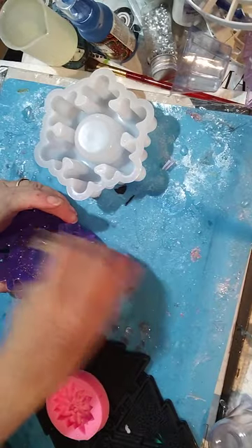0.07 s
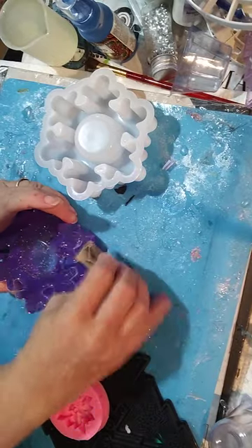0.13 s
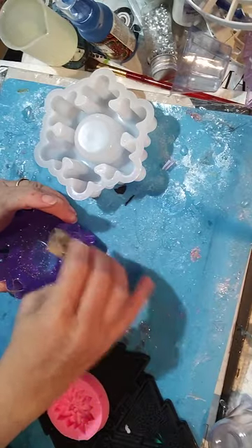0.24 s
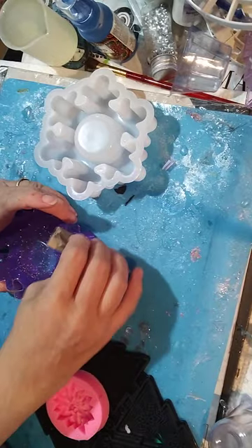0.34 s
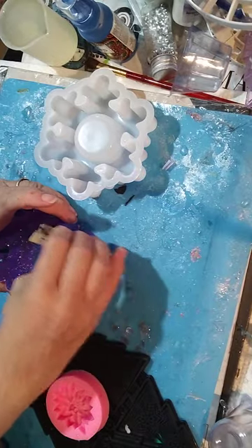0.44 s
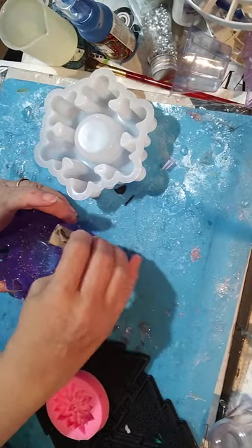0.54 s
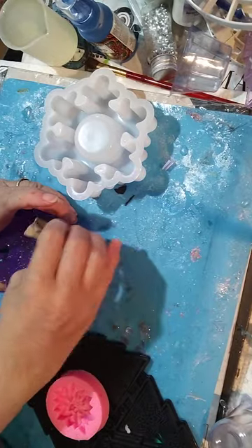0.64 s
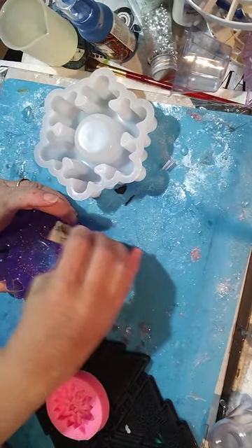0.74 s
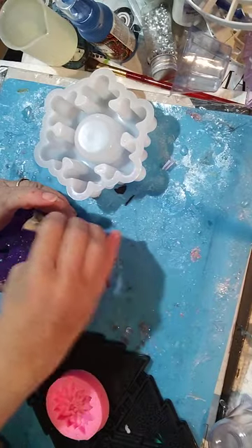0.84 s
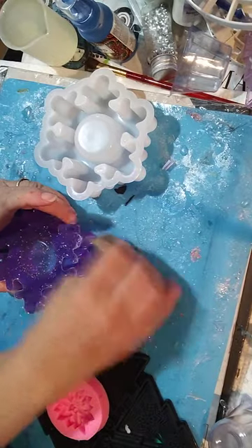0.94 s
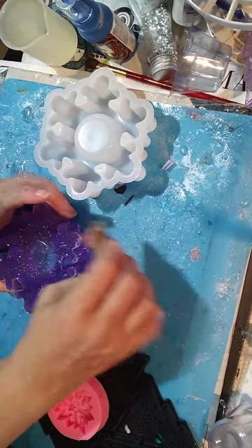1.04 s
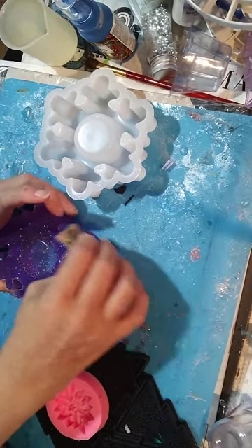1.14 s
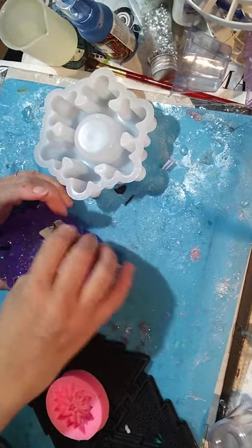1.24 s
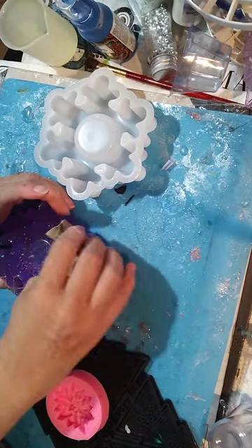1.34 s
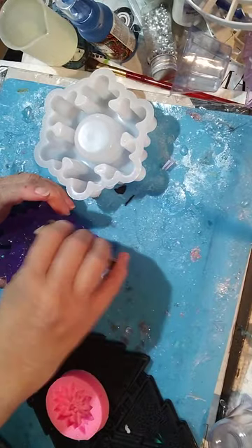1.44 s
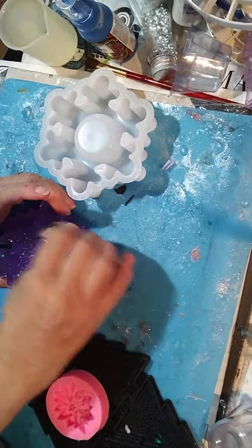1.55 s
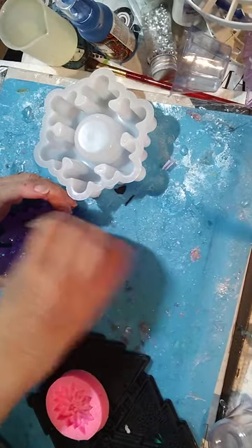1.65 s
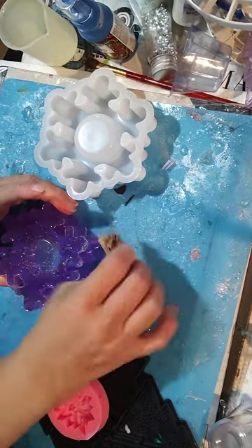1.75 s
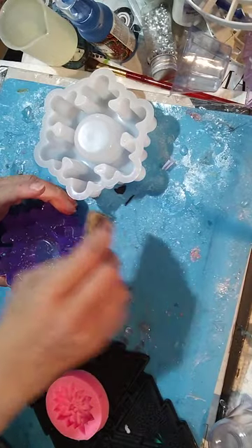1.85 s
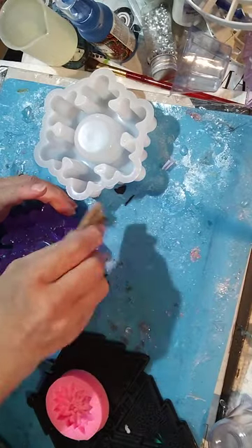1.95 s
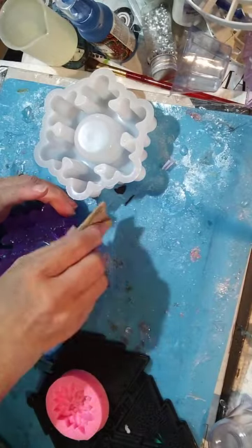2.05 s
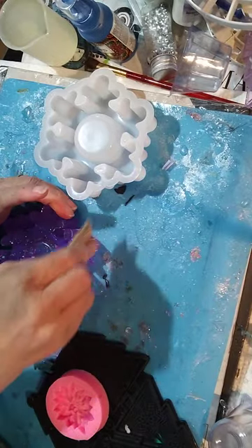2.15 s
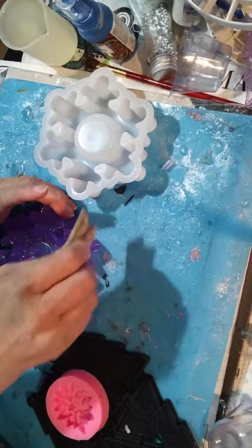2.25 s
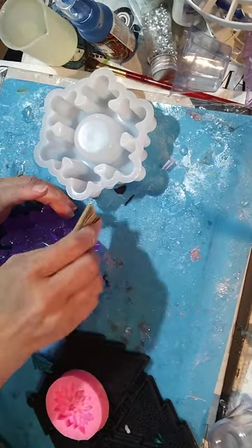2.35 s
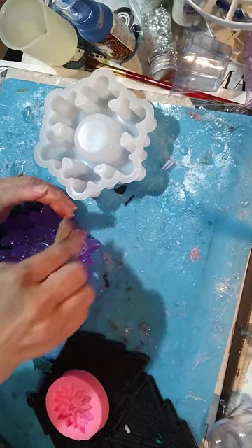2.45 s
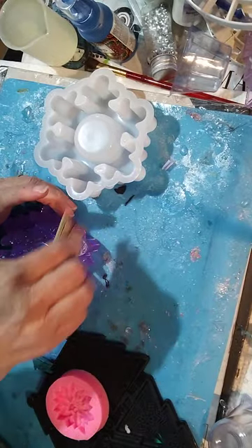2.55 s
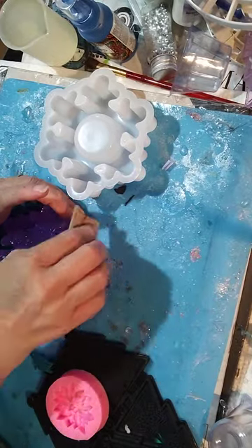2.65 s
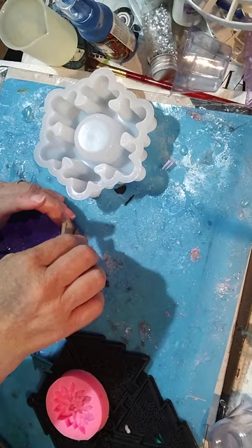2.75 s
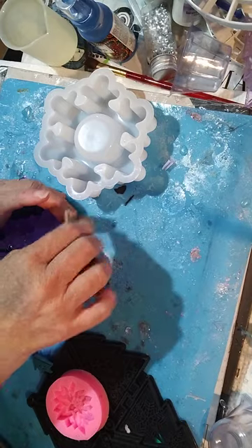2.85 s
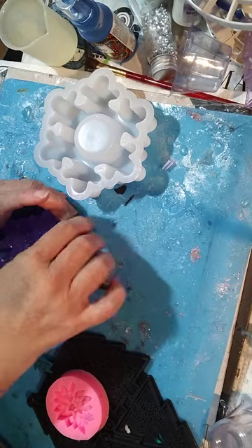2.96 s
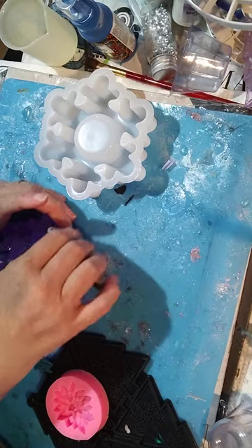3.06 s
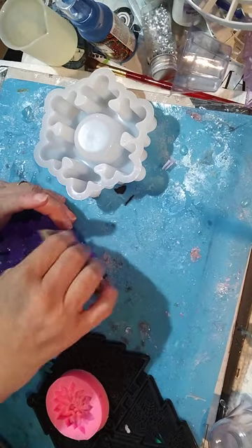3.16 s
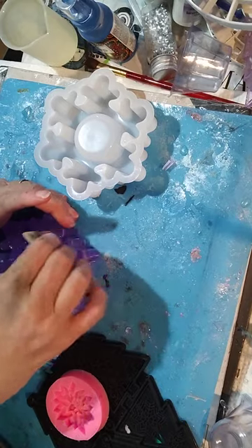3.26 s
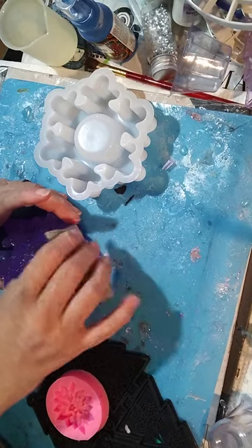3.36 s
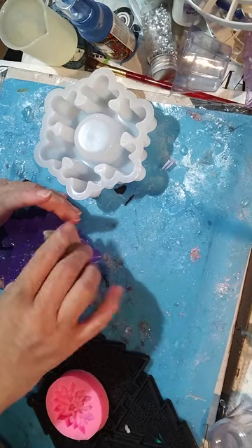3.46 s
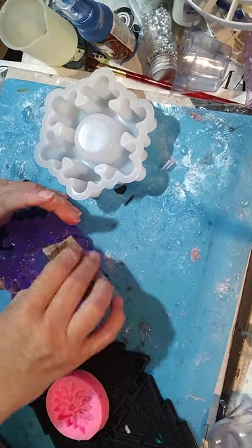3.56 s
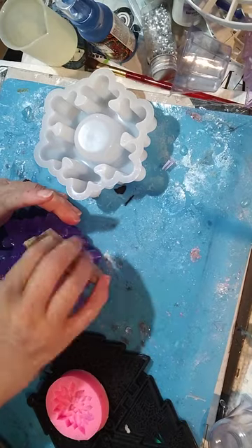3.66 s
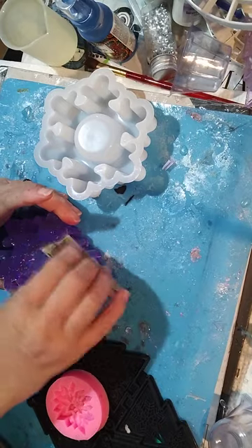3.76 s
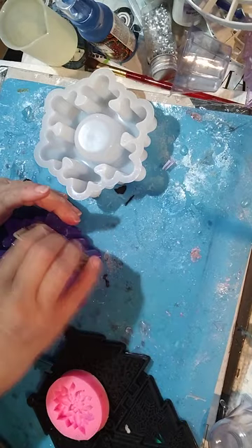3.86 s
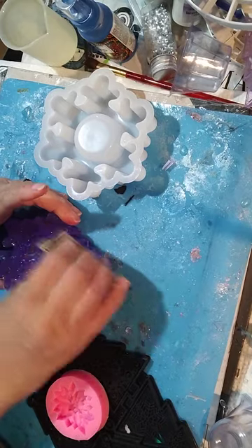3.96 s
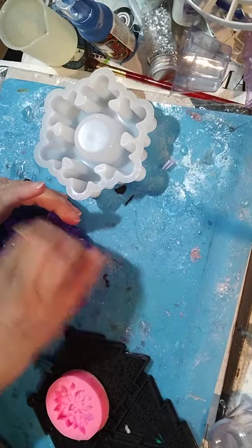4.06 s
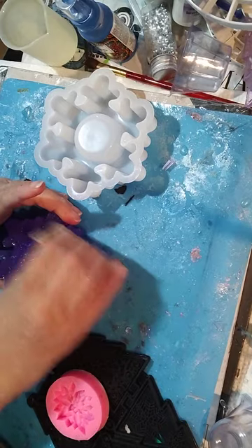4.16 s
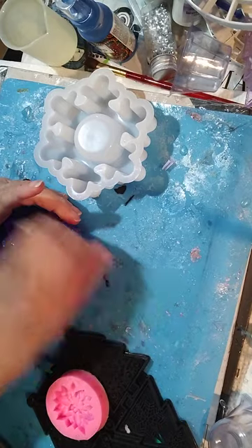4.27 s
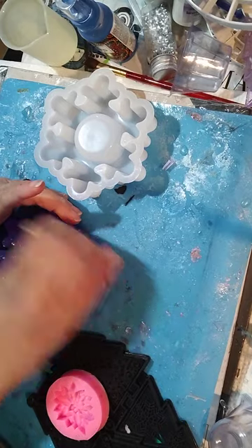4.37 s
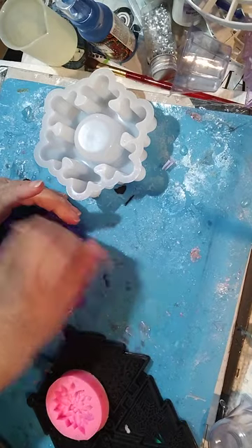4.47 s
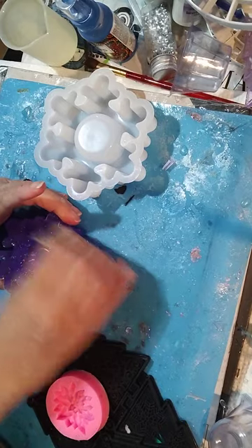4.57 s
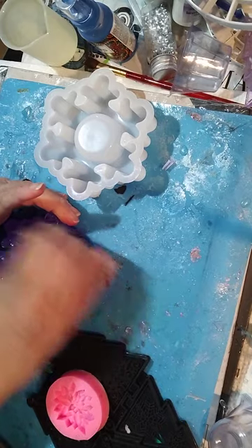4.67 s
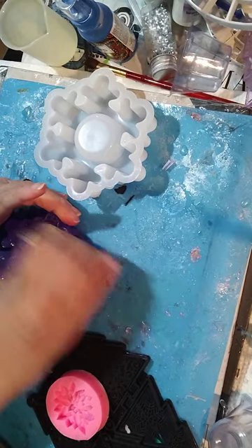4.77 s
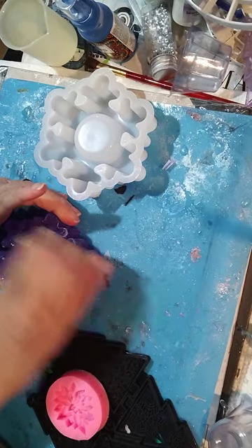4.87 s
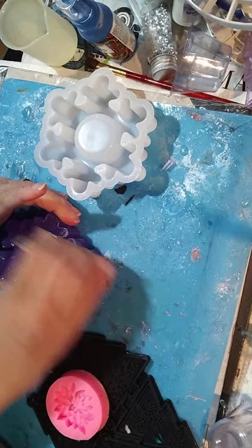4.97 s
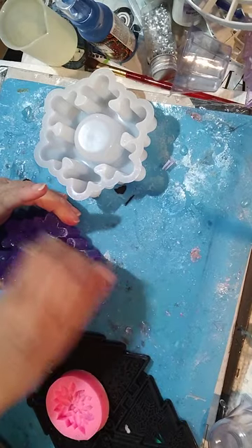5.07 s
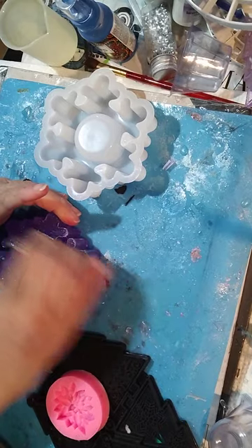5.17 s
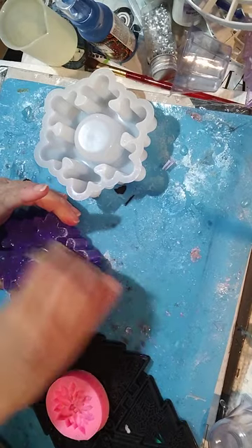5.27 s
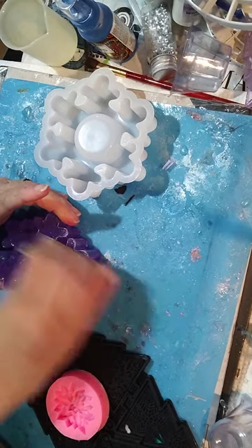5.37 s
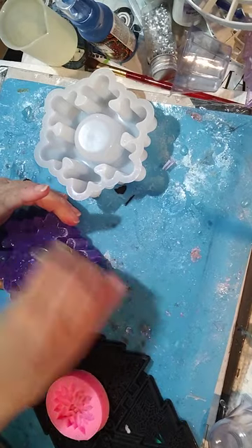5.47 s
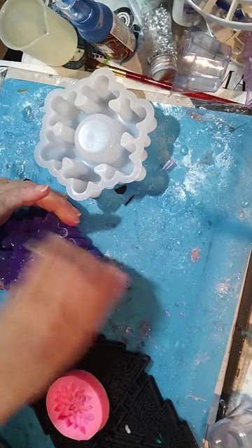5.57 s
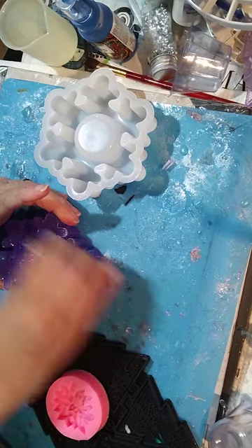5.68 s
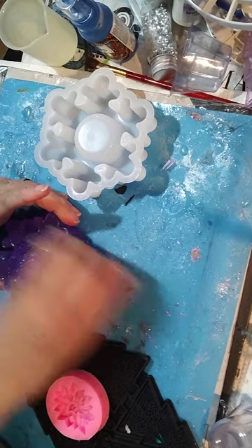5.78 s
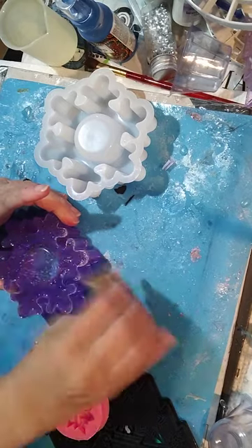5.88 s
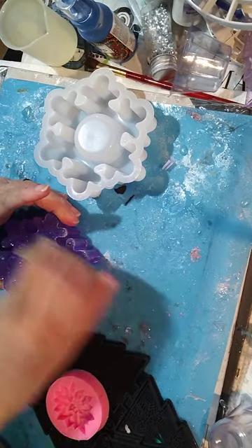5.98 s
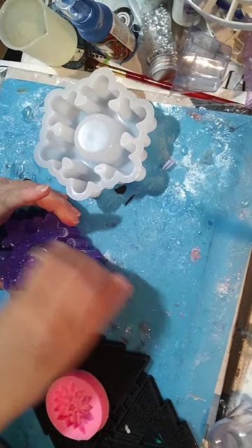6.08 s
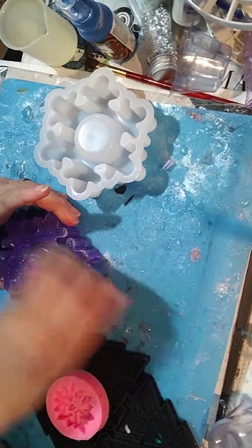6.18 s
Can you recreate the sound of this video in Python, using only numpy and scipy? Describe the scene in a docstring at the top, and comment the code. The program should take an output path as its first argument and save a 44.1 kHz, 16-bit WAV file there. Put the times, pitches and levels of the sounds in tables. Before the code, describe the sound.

Sandpaper rubs a hard resin casting held on a table. The first strokes are quick and uneven, then come gaps with soft rustling, edge ticks, light knocks and one tiny rising buzz as the piece rocks. After that, a continuous rapid to-and-fro rasp runs almost to the end, harsher and louder. Heard very close in a small quiet room with faint air tone and short reflections.

```python
"""Sandpaper on a resin casting

Folded sandpaper is rubbed quickly to and fro over a lumpy resin casting that a hand holds on a craft table.
Grit is noise roughened by uneven snags and swelled by each stroke; it hisses in the paper and rings the
resonances of casting and table. Catching edges tick, the casting knocks and once buzzes as it rocks to rest.
A small quiet room surrounds it; a phone close above hears it through two unlike microphone ports."""
import sys
import numpy as np
from scipy import signal
from scipy.fft import rfft, irfft
from scipy.io import wavfile
from scipy.ndimage import uniform_filter1d

SR = 44100
rng = np.random.default_rng(int(sys.argv[2]) if len(sys.argv) > 2 else 0)


def log_audio(samples):
    """Write samples as a 16-bit WAV file to the path given in sys.argv[1]."""
    # one column per channel
    frames = np.atleast_2d(samples).T
    # limit to full scale, then quantise
    limited = np.clip(frames, -1, 1)
    pcm = np.round(limited * 32767).astype(np.int16)
    wavfile.write(sys.argv[1], SR, pcm)


N = 274302

# Rubbing strokes: (start [s], length [s], relative hiss level [dB], pressure peak "early" or "late")
STROKES = [(0.0, 0.014, -30, "early"), (.075, 0.053, -30.5, "late"), (.168, 0.11, -20, "early"),
           (0.512, 0.061, -31.5, "late"), (.609, 0.047, -31.3, "late"), (.696, .054, -29.5, "early"),
           (0.771, 0.082, -31, "late"), (0.884, 0.06, -28.5, "early"), (0.977, 0.079, -27, "early"),
           (1.498, 0.047, -40.5, "late"), (1.585, 0.058, -36.5, "early"), (1.669, 0.074, -27, "late"),
           (1.753, 0.062, -20.5, "late"), (2.009, 0.042, -33, "late"), (2.122, 0.044, -43, "early"),
           (2.184, 0.11, -36, "late"), (2.486, 0.14, -32, "late"), (2.752, 0.031, -43, "early"),
           (2.891, 0.028, -41, "early"), (2.938, 0.042, -46.5, "early"), (3.065, 0.088, -46.5, "late"),
           (3.268, .042, -26.5, "early"), (3.372, 0.083, -53, "late"), (3.555, 0.066, -42, "early"),
           (3.62, .055, -38.5, "early"), (3.695, 0.076, -36, "early"), (3.812, 0.061, -26.5, "late"),
           (3.912, 0.074, -20.5, "late"), (4.016, 0.078, -20.5, "early"), (4.117, 0.09, -16.5, "early"),
           (4.227, 0.083, -19.5, "early"), (4.336, 0.078, -15.5, "late"), (4.435, 0.091, -20, "early"),
           (4.556, 0.079, -18.5, "late"), (4.656, .079, -19, "early"), (4.768, .09, -21, "late"),
           (4.878, 0.067, -18.5, "early"), (4.974, 0.082, -17.5, "late"), (5.079, .083, -16, "early"),
           (5.189, 0.082, -16.5, "early"), (5.291, 0.081, -16.5, "early"), (5.395, 0.085, -21.5, "early"),
           (5.49, 0.065, -20, "early"), (5.595, 0.066, -22.5, "late"), (5.689, 0.071, -23, "early"),
           (5.784, 0.079, -23.5, "late"), (5.881, 0.077, -16.5, "early"), (6.189, 0.042, -24, "late")]
# Part of a stroke spent swelling, for each place of the pressure peak: {peak: share [0-1]}
RISE_SHARE = {"early": .3, "late": .6}
# Hum under a stroke whose hiss is at FIRM_DB: (time [s], casting level [dB], table level [dB])
HUM_LEVELS = [(0, -36.5, -36.5), (.2, -34.5, -51), (.6, -36, -41.5), (1.0, -38.5, -37.5), (1.6, -39.5, -38),
              (2.0, -37.5, -53), (2.4, -34.5, -42), (2.9, -46.5, -43.5), (3.27, -34.5, -61),
              (3.55, -41, -44.5), (3.63, -42.5, -37.5), (3.799, -41.5, -47), (4.2, -41, -40.5),
              (5.2, -40.5, -43.5), (6.2, -41, -43)]
# Edges of the bands in which the paper's hiss swells separately: (frequency [Hz])
PAPER_BAND_EDGES = [3000, 4500, 6200, 9000, 18000]
# Casting resonances: (frequency [Hz], width [Hz], level rubbed on the rim [dB], level rubbed on the face [dB])
CASTING_MODES = [(819, 25, -6, -31), (912, 47, 4, -3.5), (1158, 140, 0.5, -2.5), (1446, 370, 6, 0),
                 (2065, 1090, 10.5, 16.5), (2700, 280, 9.5, -6), (3290, 220, -3.5, 3)]
# Table-top resonances: (frequency [Hz], width [Hz], relative level [dB])
TABLE_MODES = [(102, 26, 0), (141, 16, 0), (185, 50, -5), (265, 14, -4), (310, 40, -2), (405, 70, -7),
               (520, 150, -10)]
# Room-tone spectrum: (frequency [Hz], relative level [dB per Hz])
AIR_SPECTRUM = [(30, -20), (120, 10.5), (250, 0), (600, -12), (2000, -18.5), (6000, -30), (14000, -10)]
# Paper edge catching on the casting: (time [s], relative burst level [dB])
TICKS = [(.401, -39), (.469, -43.5), (.8854, -27), (1.0289, -17), (1.3097, -49), (1.4115, -36.5),
         (1.4395, -32), (1.5905, -37), (1.9014, -35), (1.9202, -30.5), (1.9748, -28.5), (2.0139, -24),
         (2.1304, -30), (2.295, -23.5), (2.3268, -30), (2.7557, -31), (2.768, -33), (2.9052, -18),
         (2.9515, -32), (3.0151, -24.5), (3.0721, -30.5), (3.1286, -30), (3.137, -31), (3.2126, -40),
         (3.2722, -14), (3.2877, -17), (3.3972, -40), (3.5643, -28), (3.571, -28), (3.608, -34),
         (3.799, -31)]
# Light rustle of the paper on the casting, during and between strokes, with some faint rubs:
# (time [s], relative hiss level [dB])
RUSTLE = [(1.2, -71), (1.27, -57), (1.42, -61), (1.85, -40), (2.1, -66), (2.3, -41), (2.4, -46.5),
          (2.47, -37.5), (2.65, -48.5), (2.87, -44.5), (2.98, -38.5), (3.05, -76), (3.2, -59),
          (3.24, -43.5), (3.36, -80), (3.56, -54.5), (3.8, -74), (3.88, -70)]
# Casting knocking on the table: (time [s], relative burst level [dB])
KNOCKS = [(2.129, -38), (2.753, -40.5), (2.957, -40), (3.372, -44.5), (3.567, -41), (6.183, -32)]
# Colour of each microphone port: (frequency [Hz], gain [dB])
LEFT_PORT = [(60, -6.5), (600, -4), (2000, 0.5), (3500, -5.5), (5200, -9.5), (8500, 0), (10000, -1.5),
             (14500, -15.5)]
RIGHT_PORT = [(60, -15), (300, -5), (1200, -5.5), (2000, 3.5), (3900, 8.5), (4950, 15), (6950, 19.5),
              (7850, 5.5), (9050, -2.5), (10100, -10), (12000, -6), (14500, -10.5)]

START_DB, END_DB = -12.5, -18.0  # stroke level at touch and one fall time after its peak
TOUCH_S = 0.0034  # time scale of the touch
HUM_FLATNESS = 0.82  # share of the hiss's swell and fade in dB that the hum takes
FIRM_DB = -20  # reference hiss
CASTING_SLOPE, TABLE_SLOPE = 0.78, 0.35  # dB of hum for each dB of hiss
PAPER_DB = -14.0  # mix level of the paper
FACE_FROM_S = 4  # the paper moves from the rim to the face
RUSTLE_CASTING_DB, TICK_CASTING_DB, KNOCK_CASTING_DB = -21.0, -27, -6  # share that rings the casting
KNOCK_TABLE_DB = 1.5
AIR_DB = -57  # room tone before the ports
NEAR_T60_S, NEAR_DB, ROOM_T60_S, ROOM_DB = 0.14, -7, 0.51, -22.5
ROCK_S, ROCK_LENGTH_S, ROCK_FROM_HZ, ROCK_TO_HZ, ROCK_DB = 2.811, .026, 230, 480, -44
BASS_CUT_HZ, TOP_HZ = 84, 14400


def undb(db):
    """Amplitude factor for a level in dB."""
    return 10 ** (np.asarray(db) / 20)


def unit(x):
    """Scale to an RMS of 1."""
    return x / np.sqrt(np.mean(x ** 2))


def walk(rate):
    """Random levels held 1 / rate seconds and slewed twice; spread near 1."""
    hold = int(SR / rate)
    steps = np.repeat(rng.standard_normal(N // hold + 1), hold)
    slewed = uniform_filter1d(uniform_filter1d(steps, hold), hold)
    return 1.3 * slewed[:N]  # makes up for the spread lost in slewing


def pair(like):
    """Noise for two ports, with correlation `like` between them."""
    common, opposed = rng.standard_normal((2, N))
    like = np.clip(like, 0, 1)
    side = np.array([[1], [-1]])
    return np.sqrt((1 + like) / 2) * common + np.sqrt((1 - like) / 2) * opposed * side


def decay(x, ms):
    """Let every impulse die away exponentially with a time constant in ms."""
    return signal.lfilter([1], [1, -np.exp(-1000 / (ms * SR))], x)


def bursts(rows, ms):
    """A dying envelope at each (time, level)."""
    x = np.zeros(N)
    for s, db in rows:
        x[int(s * SR)] += undb(db)
    return decay(x, ms)


def colour(x, points):
    """Causal filter through (Hz, dB) points, from the cepstrum of the log gain."""
    hz, db = np.transpose(points)
    size = 2 ** 12
    grid = np.maximum(np.arange(size // 2 + 1) * SR / size, 1)
    log_gain = np.interp(np.log(grid), np.log(hz), db) * np.log(10) / 20
    cep = irfft(log_gain)
    # folding the cepstrum forward gives minimum phase
    cep[1:size // 2] *= 2
    cep[size // 2 + 1:] = 0
    impulse = irfft(np.exp(rfft(cep)))
    return signal.fftconvolve(x, impulse)[:N]


def ring(x, modes, wander_db):
    """Sum of resonances; the contact spot moves, so each is driven more or less from moment to moment."""
    out = 0
    power = sum(undb(2 * m[2]) for m in modes)
    for hz, width, db in modes:
        radius = np.exp(-np.pi * width / SR)
        angle = 2 * np.pi * hz / SR
        gain = undb(db) * np.sin(angle) * np.sqrt(2 * (1 - radius ** 2) / power)
        drive = x * undb(wander_db * walk(12))
        out = out + signal.lfilter([gain], [1, -2 * radius * np.cos(angle), radius ** 2], drive)
    return out


def grit(rate, spread_db, ms):
    """Bite of the grains on smooth contact: snags of very unequal size, each a short dying burst."""
    snags = rng.random(N) < rate / SR  # rate in snags per second
    size_db = spread_db * np.minimum(rng.exponential(size=N), 3)
    return unit(1 + decay(snags * undb(size_db), ms))


def room_tone():
    """Quiet steady air: coloured noise partly shared by the ports."""
    air = np.array([colour(c, AIR_SPECTRUM) for c in pair(0.27)])
    return unit(air) * undb(AIR_DB)


def stroke_pressure():
    """Pressure of each stroke: quick touch, swell, accelerating fade; rows for hiss, casting and table."""
    t = np.arange(N) / SR
    power = np.zeros((3, N))
    when, casting, table = np.transpose(HUM_LEVELS)
    for s, length, db, peak in STROKES:
        rise = RISE_SHARE[peak] * length
        fall = length - rise
        span = slice(max(int((s - 4 * TOUCH_S) * SR), 0), int((s + rise + 3 * fall) * SR))
        d = t[span] - s
        swell = START_DB * np.abs(1 - d / rise) ** 2.87
        fade = END_DB * (np.abs(d - rise) / fall) ** 2.44
        shape = np.where(d < rise, swell, fade)
        touch = undb(np.minimum(d, 0) / TOUCH_S * 10)
        casting_db = np.interp(s, when, casting) + CASTING_SLOPE * (db - FIRM_DB)
        table_db = np.interp(s, when, table) + TABLE_SLOPE * (db - FIRM_DB)
        # the hum swells and fades less steeply than the hiss
        hum_shape = HUM_FLATNESS * shape
        levels = np.array([db + shape, casting_db + hum_shape, table_db + hum_shape])
        power[:, span] += (touch * undb(levels)) ** 2
    return np.sqrt(power)


def paper_hiss(pressure, rustle):
    """Grit noise and edge ticks in the folded sheet, which flexes so each band swells on its own."""
    rubbing = pressure * grit(700, 1.3, 0.48) * undb(1.62 * walk(120))
    noise = (rubbing + rustle + edge_ticks(1.88)) * pair(0.)
    out = 0
    for band in zip(PAPER_BAND_EDGES, PAPER_BAND_EDGES[1:]):
        sos = signal.butter(1, band, "band", fs=SR, output="sos")
        out = out + signal.sosfilt(sos, noise) * undb(1.07 * walk(21.925))
    return undb(PAPER_DB) * out


def casting_hum(pressure, rustle, knocks):
    """Grit, rustle, ticks and knocks ring the resin; rim and face excite its resonances differently."""
    force = pressure * grit(500, 1.1, 1.0) + undb(RUSTLE_CASTING_DB) * rustle
    force = force + undb(TICK_CASTING_DB) * edge_ticks(4.7) + undb(KNOCK_CASTING_DB) * knocks
    body = force * pair(0.42)
    on_face = np.arange(N) / SR >= FACE_FROM_S
    rim_modes = [(hz, width, rim_db) for hz, width, rim_db, _ in CASTING_MODES]
    face_modes = [(hz, width, face_db) for hz, width, _, face_db in CASTING_MODES]
    return ring(body * ~on_face, rim_modes, 4.5) + ring(body * on_face, face_modes, 3.4)


def table_hum(pressure, knocks):
    """Grit noise with sparser snags and the knocks ring the low resonances of the table top."""
    force = pressure * grit(200, 0.98, 1.7) + undb(KNOCK_TABLE_DB) * knocks
    return ring(force * pair(0.91), TABLE_MODES, 2.6)


def room(x):
    """Close clutter on the table scatters at once; the walls give a longer faint tail."""
    t = np.arange(SR // 2) / SR

    def tail(db, t60):
        energy = t60 * SR / np.log(10 ** 6)
        return undb(db - 60 * t / t60) / np.sqrt(energy)

    echoes = (tail(NEAR_DB, NEAR_T60_S) + tail(ROOM_DB, ROOM_T60_S)) * pair(0.56)[:, :len(t)]
    return x + signal.fftconvolve(x, echoes, axes=1)[:, :N]


def edge_ticks(ms):
    """Envelope of the paper edge catching: sudden bursts that die in a few ms."""
    return bursts(TICKS, ms)


def paper_rustle():
    """Envelope of light rustle and faint rubs of the paper: a gliding level roughened by sparse large snags."""
    s, db = np.transpose(RUSTLE)
    level = undb(np.interp(np.arange(N) / SR, s, db, -120, -120))
    return level * grit(60, 7.2, 7.5) * undb(4.9 * walk(24.94))


def casting_knocks():
    """Force envelope of the casting knocking on the table: brief dying impacts."""
    return bursts(KNOCKS, 1.75)


def rocking():
    """The casting rocks to rest: ever faster bounces blur into a buzz, a rising tone of three harmonics."""
    u = np.clip((np.arange(N) / SR - ROCK_S) / ROCK_LENGTH_S, 0, 1)
    hz = ROCK_FROM_HZ + (ROCK_TO_HZ - ROCK_FROM_HZ) * u ** 2
    phase = 2 * np.pi * np.cumsum(hz) / SR
    buzz = np.sin(phase) + 0.83 * np.sin(2 * phase) + 0.39 * np.sin(3 * phase)
    swell = np.sqrt(np.sin(np.pi * u).clip(0)) * (u < 1)
    return undb(ROCK_DB) * swell * buzz


def sanding():
    """Stroke pressure, rustle and impacts drive the paper, the casting and the table."""
    hiss, casting, table = stroke_pressure()
    rustle = paper_rustle()
    knocks = casting_knocks()
    paper = paper_hiss(hiss, rustle)
    return paper + casting_hum(casting, rustle, knocks) + table_hum(table, knocks) + rocking()


def scene():
    """The sanding with its room reflections, over the room tone."""
    air = room_tone()
    return room(sanding()) + air


def record(dry):
    """Each port has its own cavity resonance; deep bass and the top are cut."""
    ports = np.array([colour(dry[0], LEFT_PORT), colour(dry[1], RIGHT_PORT)])
    bass_cut = signal.butter(3, BASS_CUT_HZ, "high", fs=SR, output="sos")
    top_cut = signal.ellip(10, .2, 85, TOP_HZ, fs=SR, output="sos")
    return signal.sosfilt(top_cut, signal.sosfilt(bass_cut, ports))


dry = scene()
out = record(dry)
log_audio(out)
```